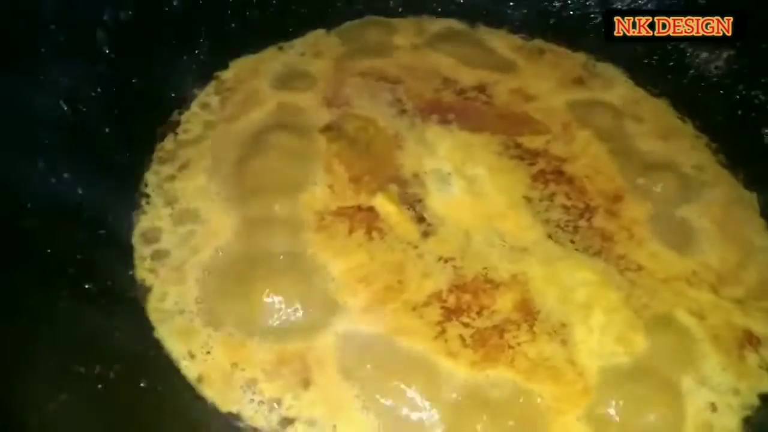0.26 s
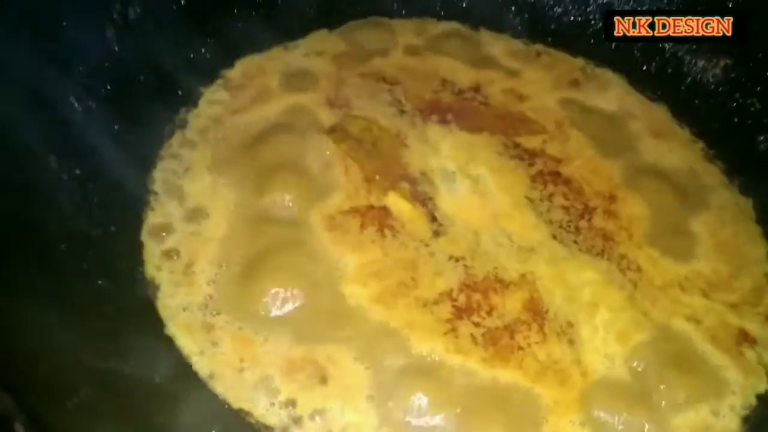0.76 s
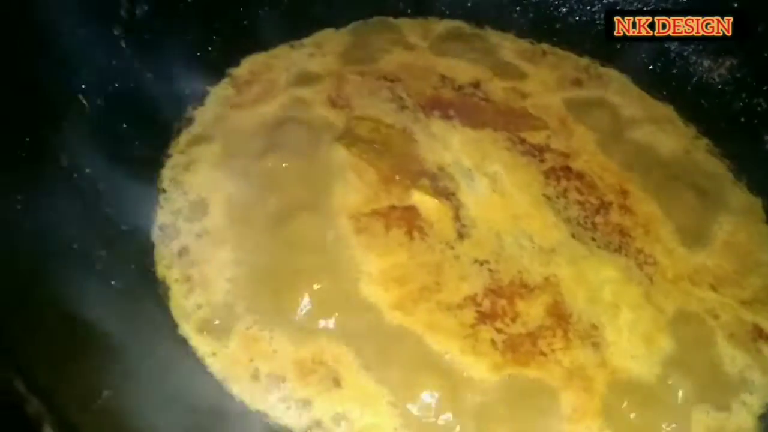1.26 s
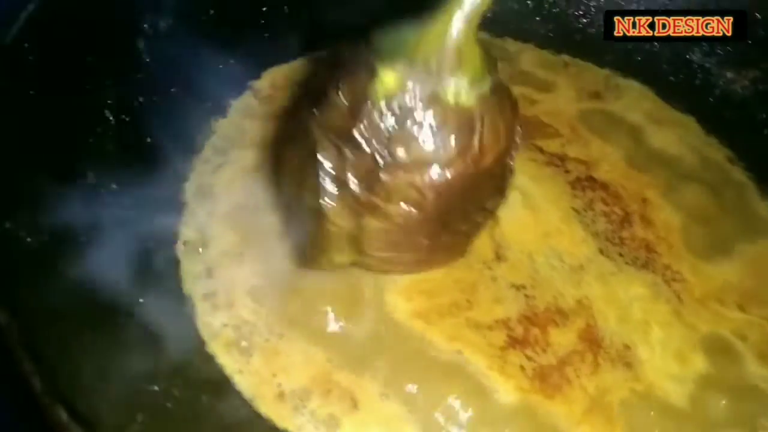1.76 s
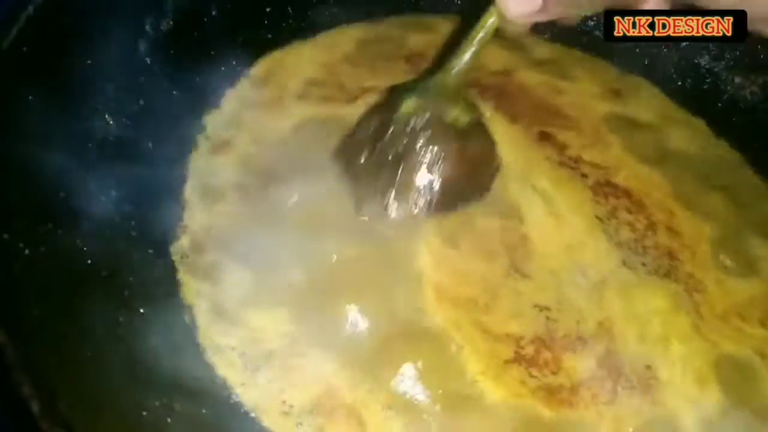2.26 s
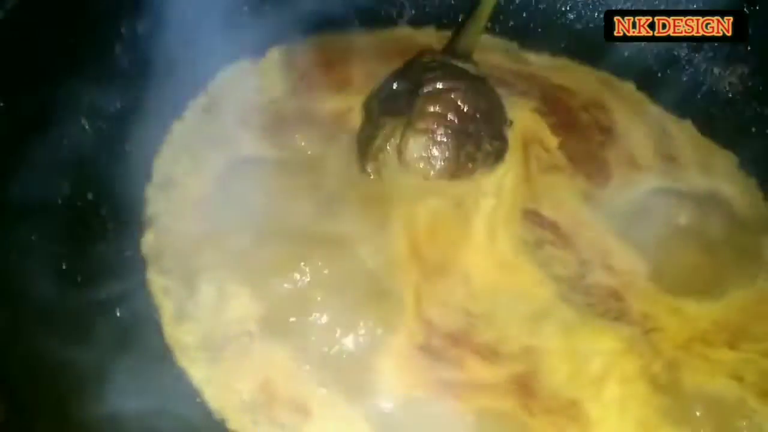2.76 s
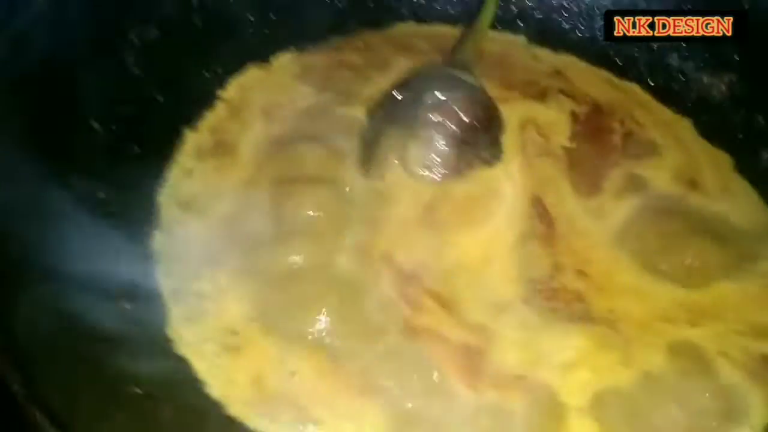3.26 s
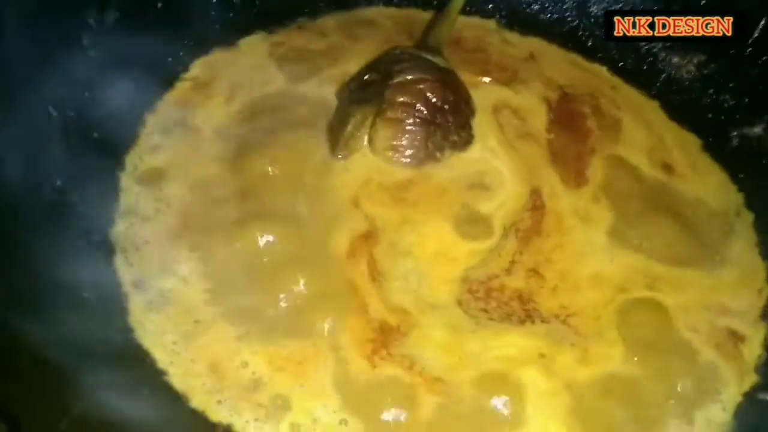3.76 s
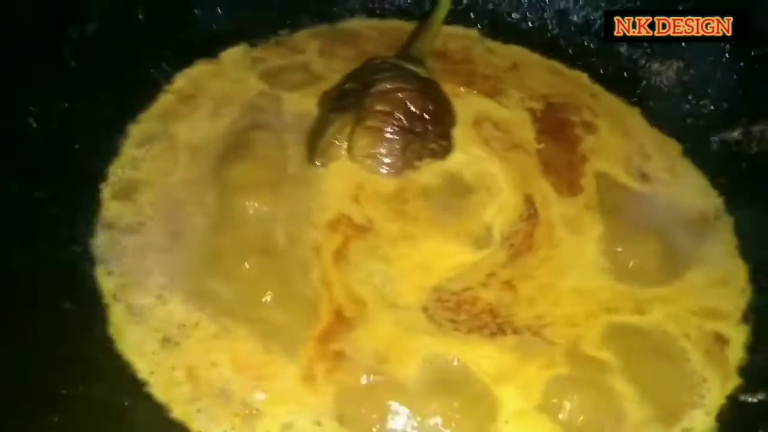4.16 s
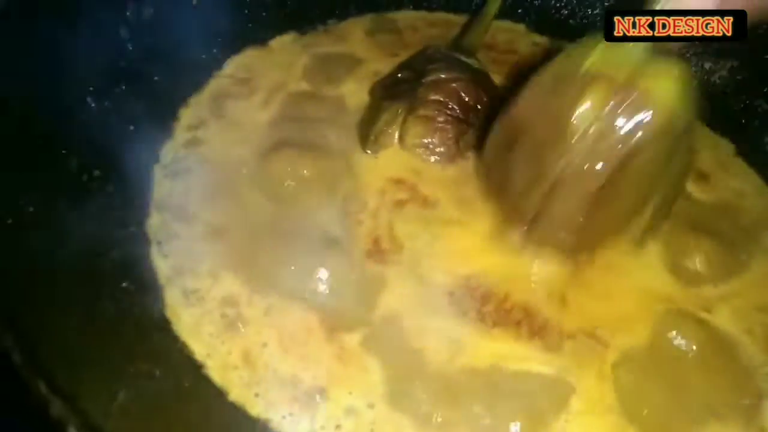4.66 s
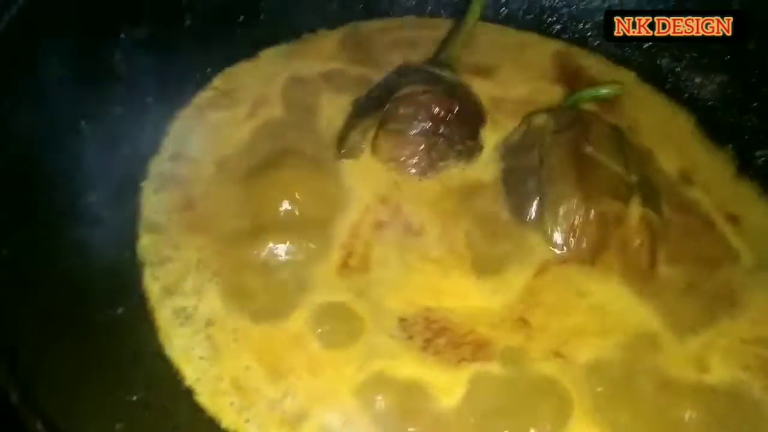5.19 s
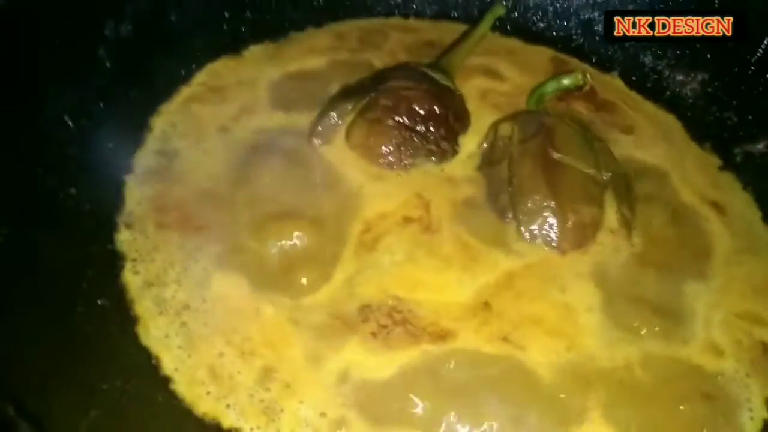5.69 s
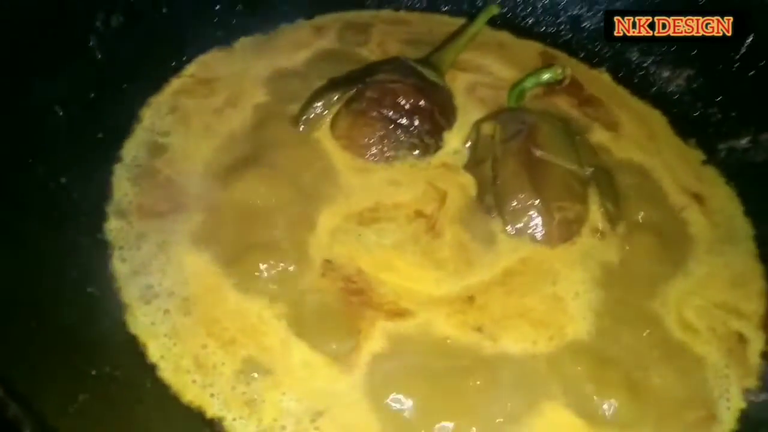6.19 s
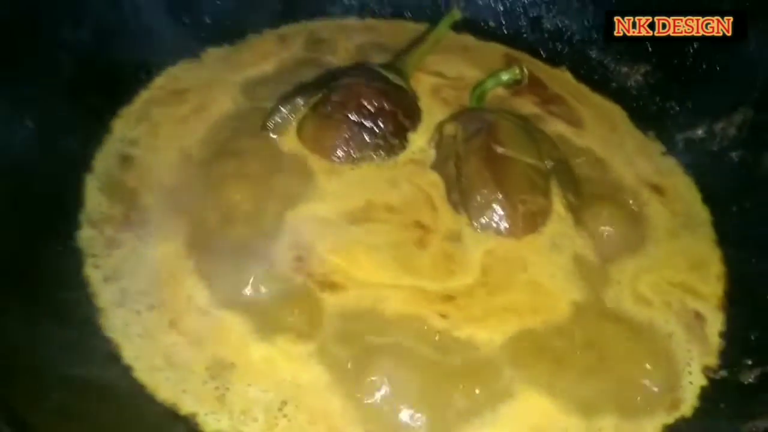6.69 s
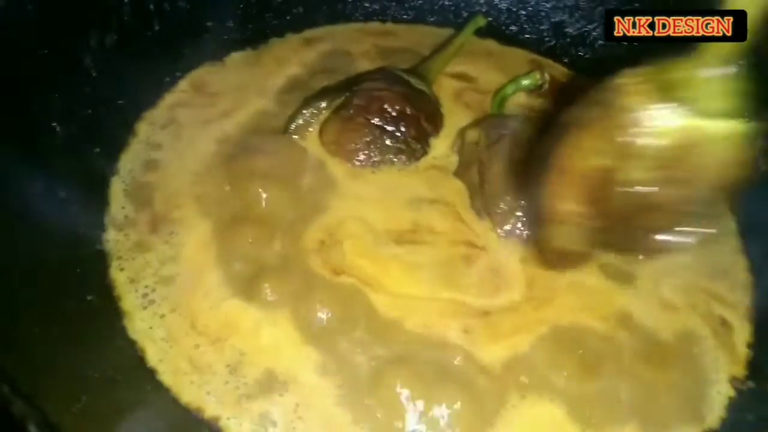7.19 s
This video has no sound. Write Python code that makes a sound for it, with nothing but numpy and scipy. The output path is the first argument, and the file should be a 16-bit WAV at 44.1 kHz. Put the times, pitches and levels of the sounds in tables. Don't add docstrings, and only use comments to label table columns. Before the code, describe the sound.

A close phone pickup of gravy simmering in a wide pan in a kitchen, with faint low hum. Fine fizz, crackle and rim hiss run throughout, dotted with soft, rising deep blips. From the start dull, woody, boomy thumps on the counter repeat every 0.4 seconds. A sharp spit cracks at 0.7. Boiling is lively from 0.5 to 1.6; bright pops and dry fat ticks crowd between 1.4 and 2.1, when the sizzle peaks, with another surge near 2.6. It calms around 3 to 3.9, then strong pops snap at 3.95 to 4.2. From about 4.5 a gas flame flutters as a low, uneven rumble, with short wavering hoots around 100 hertz. Spits crack at 4.9, 5.3 and 5.9. The blows from 5.0 are heavier, especially at 5.0 and 5.8. Pops, flutter and thumps continue until the end near 7.4.

```python
import sys
import numpy as np
from scipy import signal
from scipy.io import wavfile
from scipy.ndimage import uniform_filter1d

SR = 44100
rng = np.random.default_rng(int(sys.argv[2]) if len(sys.argv) > 2 else 0)


def log_audio(samples):
    frames = np.atleast_2d(samples).T
    limited = np.clip(frames, -1, 1)
    pcm = np.round(limited * 32767).astype(np.int16)
    wavfile.write(sys.argv[1], SR, pcm)


def to_linear_factor(level_db):
    exponent = np.asarray(level_db, float) / 20
    return 10 ** exponent


N = 328104

# start_s [s], boil_db [dB], sizzle_db [dB]
SIMMER = [(0, -3, 1.5), (.3, 3.5, -2.5), (.75, 5, 2.5), (1.199, 4.5, 1.5), (1.55, 3.5, 4.5),
          (1.95, -2.5, 7.5), (2.25, 0.5, -0.5), (2.6, 1.5, 6.5), (2.85, -2, -6), (3.6, 0, -7),
          (4.152, -1.5, -1.5), (4.652, -1, -11.5), (5.1, -3, -0.5), (5.5, 1, -3.5), (5.95, -2, -13.5),
          (6.7, -5.5, 3.5), (7.0, 2.5, -9), (7.44, -3, -2)]


def evened(x):
    return x / np.sqrt(np.mean(x ** 2) + 1e-20)


def read(points, hz):
    f, value = np.transpose(points)
    return np.interp(np.log(hz + 1), np.log(f + 1), value)


def add(mix, s, sound):
    part = mix[round(s * SR):][:len(sound)]
    part += sound[:len(part)]


def grid(size):
    return np.fft.rfftfreq(size, 1 / SR)[:, None], np.arange(4 * N // size + 5) * size / 4 / SR


def noise(field_db, size):
    a, b = rng.standard_normal(field_db.T.shape + (2,)).T
    spectrum = (a + 1j * b) * to_linear_factor(field_db)
    x = signal.istft(spectrum, nperseg=size, noverlap=3 * size // 4)[1][:N]
    return x * np.sqrt(4 / 3 / size)


def patches(size, wide_hz, long_s):
    hz, t = grid(size)
    z = rng.standard_normal((len(t), len(hz))).T
    for axis, span in enumerate([wide_hz * size / SR, long_s * 4 * SR / size]):
        for _ in range(2):
            z = uniform_filter1d(z, max(1, round(span)), axis)
    return evened(z)


def kitchen(size=2048):
    # pitch_hz [Hz], level_db [dB per Hz]
    floor = [(25, -18), (100, 11.5), (200, 2), (420, -7), (600, -68)]
    hz, t = grid(size)
    colour_db = read(floor, hz) - 40 * (hz > 900)
    return to_linear_factor(-69.5) * evened(noise(colour_db + 0 * t, size))


def flame(size=2048):
    # start_s [s], level_db [dB], upper_db (share of the upper range) [dB]
    flutter = [(4.4, -71, 2), (4.48, -47, -30), (4.6, -45, 6), (4.77, -47, 5), (4.83, -44.5, -8),
               (5.09, -48, 7), (5.14, -54, 2), (5.201, -41, -4), (5.48, -47.5, 9.5), (5.62, -39.5, 7),
               (5.9, -44.5, -6), (5.998, -47.5, 4.5), (6.29, -46.5, 6), (6.4, -46, -6), (6.55, -51, -17),
               (6.87, -40.5, -2), (7.209, -48, -1.5), (7.39, -46, -2.5)]
    # pitch_hz [Hz], level_db [dB per Hz]
    flame_colour = [(12, -67), (20, -56), (38, -12), (70, -28), (90, -4), (107, -1), (164, -12),
                    (214, -23.5), (276, -27.5), (420, -72), (550, -95), (920, -120)]
    hz, t = grid(size)
    s, level_db, upper_db = np.transpose(flutter)
    lift_db = np.interp(t, s, upper_db) * np.clip((hz - 130) / 80, 0, 1)
    boom_db = 6.6 * np.exp(-((hz - 103) / 9) ** 2)
    lumps_db = 2.0 * patches(size, 50, .08)
    x = evened(noise(read(flame_colour, hz) + lift_db + boom_db + lumps_db, size))
    x = evened(x / (0.16 + uniform_filter1d(x ** 2, size=1200)) ** 0.37)
    drift = uniform_filter1d(rng.standard_normal(N), size=2000)
    gusts_db = 1.4 * evened(uniform_filter1d(drift, size=2000))
    course_db = np.interp(np.arange(N) / SR, [s[0] - .04, *s], [-100, *level_db])
    return x * to_linear_factor(gusts_db + course_db)


def hoots():
    # middle_s [s], length_s [s], peak_db [dB], pitch_hz [Hz]
    catches = [(4.658, 0.084, -34.5, 103.1), (4.748, 0.041, -33.5, 103.7), (4.946, 0.077, -42, 98.2),
               (5.098, 0.065, -38.5, 96.4), (5.205, 0.12, -36.5, 104.5), (5.301, 0.13, -33.5, 103.5),
               (5.609, .1, -37.5, 102.3), (5.77, 0.062, -35, 94.8), (6.025, 0.19, -32.5, 105.6),
               (6.16, 0.081, -43, 104), (6.546, 0.09, -39.5, 99.1), (6.877, 0.072, -39.5, 110),
               (7.001, 0.13, -41, 117), (7.273, 0.066, -41, 110.8), (7.373, 0.0892, -39.5, 113.4),
               (5.362, .06, -54, 262), (5.448, .08, -43.5, 243.6), (5.6, .12, -50, 152.2),
               (5.399, 0.0994, -41, 72), (2.428, 0.0395, -50, 117.5), (6.401, 0.09, -44, 76)]
    out, t = np.zeros(N), np.arange(N) / SR
    swell, pull, waver = np.zeros((3, N)) + [[1e-6], [1e-4], [0]]
    for (s, length, db, hz), turn in zip(catches, rng.random(len(catches))):
        at = np.arange(0, 1.694 * length, 1 / SR)
        start = s - .8 * length
        wobble = 0.82 * np.sin(55 * at + 9 * turn)
        throb_db = 2.5 * np.sin(95 * at + 20 * turn)
        shape = to_linear_factor(db - 2.0) * np.hanning(len(at)) * to_linear_factor(throb_db)
        if 90 < hz < 125:
            add(swell, start, shape)
            add(pull, start, shape * hz)
            add(waver, start, shape * wobble)
        else:
            add(out, start, shape * np.sin(2 * np.pi * (hz * at + turn) + wobble))
    phase = 2 * np.pi * np.cumsum(pull / swell) / SR
    return out + swell * np.sin(phase + waver / swell), swell


def strike_counter(blows, tails_db):
    # pitch_hz [Hz], level_db [dB], t60_s [s]
    counter = [
        [(74.1, -18.5, 0.68), (102.3, -11, 0.61), (113, 4, 0.12), (107.2, 10, 0.069)],
        [(137.76, -2.5, 0.5), (166, -4, 0.215)],
        [(247.2, 12.5, 0.13), (336.7, 15, 0.064), (392, -0.5, 0.13), (474.6, -5, 0.19), (718, -7.5, 0.21)],
        [(1080, 2.5, 0.031), (1280, 6.5, 0.03)],
    ]
    rise_s = [0.0036, 0.0027, 0.0031, 0.0019]
    lag_s = 0.001915
    out, t = np.zeros(N), np.arange(SR // 2)[:, None] / SR
    hz, mode_db, t60 = np.transpose(sum(counter, []))
    group = np.repeat(np.arange(len(counter)), [len(g) for g in counter])
    rise = 1 - np.exp(-t / np.array(rise_s)[group])
    chances = rng.standard_normal((len(blows), 2, len(hz)))
    for (s, db, *groups_db), tail_db, (a, b) in zip(blows, tails_db, chances):
        strike_db = np.array([0, *groups_db])[group] + mode_db + 1.5 * b
        slow_db = tail_db * (t60 > .2)
        decay_db = -60 * t / (t60 * to_linear_factor(0.74 * np.clip(a, -2, 1)))
        mode_hz = hz * (1 + 0.024 * np.clip(a, -1.2, 1.2))
        modes = to_linear_factor(strike_db + slow_db + decay_db) * np.sin(2 * np.pi * mode_hz * t) * rise
        blow = modes.sum(1)
        room = rng.standard_normal(len(t)) * to_linear_factor(-60 * t[:, 0] / 0.31) * (t[:, 0] > .012)
        smear = signal.fftconvolve(blow, room / np.linalg.norm(room))[:len(t)]
        blow = blow + to_linear_factor(tail_db - 7.0) * smear
        add(out, s + lag_s * (s > 0), to_linear_factor(db - 1.35) * blow / abs(blow).max())
    return out


def pounding():
    # start_s [s], peak_db [dB], then upper_boom_db, knock_db, clack_db [dB below the blow]
    blows = [(.2853, -31.5, -6, -28.5, -29), (.6792, -32, -0.5, -4.5, -9), (1.0962, -31, -5, -9.5, -10.5),
             (1.502, -32.5, -3, -7.5, -3.5), (1.8786, -31.5, -3.5, -13, -8), (2.271, -32, 4, -8, -9),
             (2.6351, -36, 1, -17, -17), (3.024, -29.5, -5, -18.5, -11.5), (3.4174, -33, -8.5, -30, -14.5),
             (3.8146, -31, -1, -12, -15), (4.228, -30, -7, -14, -16.5), (4.615, -33, -11, -14, -4.5),
             (5.0036, -23, -11, -21.5, -13), (5.4159, -28.5, 7.5, -12.5, -21),
             (5.83, -23.5, -12, -22.5, -27), (6.2299, -25, -3, -20, -32), (6.6489, -25.5, -13, -19, -9),
             (7.0653, -28, -9, -19.5, -20)]
    faint_blow = (-0.5, -56, 3, -23, -43)
    tails_db = [2.5, -1, -2, -1, 0.5, -3, -4, 0.5, -0.5, 1.5, 3.5, -0.5, 0.5, -1.5, -0.5, 0.5, 1, 2.5, 4]
    grazes = [
        (2.6245, -41.5, 0.0085, -12, 2),
        (3.404, -48, 0, -15, -20),
    ]
    return strike_counter(blows + [faint_blow], tails_db) + strike_counter(grazes, [-6, -6])


def ring(hz, width_hz):
    # delay_s [s], level_db [dB]
    echoes = [(.0011, -17.5), (.0021, -13), (.0033, -19), (.0052, -22)]
    t = np.arange(SR // 50) / SR
    u = 1.6 * np.pi * np.clip(width_hz, 150, 9000) * t
    tick = u ** 2 * np.exp(-u) * np.sin(2 * np.pi * hz * t)
    echo = (u / 2) ** 2 * np.exp(-u / 2) * np.sin(2 * np.pi * 0.837 * hz * t)
    out = tick.copy()
    for (s, db), (a, b) in zip(echoes, rng.random((len(echoes), 2))):
        add(out, s * (0.95 + 0.43 * a), np.sign(b - .5) * to_linear_factor(db) * echo)
    return out / abs(out).max()


def spray(white, low_hz, high_hz, t60):
    band = signal.butter(3, [low_hz, min(high_hz, .45 * SR)], "bandpass", fs=SR, output="sos")
    grain = to_linear_factor(2.4 * evened(uniform_filter1d(white[::-1], size=90)))
    decay = to_linear_factor(-60 * np.arange(len(white)) / SR / t60)
    return evened(signal.sosfilt(band, white * grain)) * decay


def ticks():
    # start_s [s], peak_db [dB], pitch_hz [Hz]
    fat_ticks = [(0.5002, -39, 8760), (1.0607, -37, 9900), (1.6, -38, 9200), (1.722, -37, 9850),
                 (1.743, -41, 10700), (1.751, -37, 5960), (1.762, -42, 10500), (1.861, -35, 6070),
                 (1.953, -36, 5400), (1.978, -38.5, 5540), (2.018, -37, 6450), (2.096, -40, 10600),
                 (3.191, -42.5, 9300), (4.364, -36.5, 11100), (4.4964, -34.5, 10850), (5.004, -35, 10200),
                 (5.0978, -41, 9070), (5.5882, -37, 9080), (5.68, -35.5, 8500), (5.7143, -37.5, 8040),
                 (6.107, -35, 9400), (6.1808, -38, 9260), (6.404, -41, 10500), (6.6253, -38.5, 10500),
                 (7.1322, -29, 9100), (7.394, -40.5, 10100), (.464, -38, 9900), (0.799, -36, 6500),
                 (.862, -45.5, 1500), (0.867, -40, 8800), (1.494, -37, 6900), (1.672, -46, 1490),
                 (2.263, -43.5, 2680), (2.278, -42, 9300), (3.209, -40.5, 4200), (3.8993, -36, 9300),
                 (6.3123, -37, 8950)]
    out = np.zeros(N)
    for s, db, hz in fat_ticks:
        add(out, s, to_linear_factor(db) * ring(hz, 0.15 * hz))
    return out


def spatter(per_s=700, spread_db=3.0, level_db=-53, count=8):
    sizzle_db = np.interp(np.arange(N) / SR, *np.transpose(SIMMER)[[0, 2]])
    burst = to_linear_factor(spread_db * np.minimum(rng.exponential(1, N), 3.5))
    size = burst * (rng.random(N) < per_s * to_linear_factor(.8 * sizzle_db) / SR)
    kind, out = rng.integers(0, count, N), np.zeros(N)
    for k, hz in enumerate(np.geomspace(5600, 8200, count)):
        out += signal.oaconvolve(size * (kind == k), ring(hz, 0.44 * hz))[:N]
    return out * to_linear_factor(level_db + 0.29 * sizzle_db)


def blips():
    # start_s [s], peak_db [dB], pitch_hz [Hz]
    bubbles = [(0.159, -45, 790), (0.313, -51, 830), (0.353, -48, 813), (0.457, -48, 848), (0.53, -58, 810),
               (0.636, -42, 850), (0.681, -45, 787), (0.893, -45.5, 742), (1.096, -48, 859),
               (1.231, -44, 800), (1.379, -63, 650), (1.428, -53, 743), (1.505, -46, 756),
               (1.607, -42.5, 790), (1.691, -47, 742), (1.89, -44, 724), (2.03, -51, 720),
               (2.376, -41.5, 852), (2.534, -54, 846), (2.776, -53, 820), (2.91, -49, 810),
               (3.033, -60, 589), (3.055, -46, 615), (3.724, -49, 597), (3.817, -50, 509),
               (4.399, -56, 830), (4.819, -53, 552), (5.003, -67, 500), (5.332, -47.5, 803),
               (5.83, -51.5, 505), (6.232, -48, 690), (6.355, -49, 824), (6.508, -48, 749),
               (6.755, -50, 775), (6.931, -47, 767), (7.322, -50, 750), (2.79, -54, 810), (6.57, -56, 740),
               (6.96, -50, 780)]
    length_s, climb = 0.03, 0.041
    out, t = np.zeros(N), np.arange(0, length_s, 1 / SR)
    shape = np.sin(np.pi * (t / length_s) ** 0.61) ** 2
    for s, db, hz in bubbles:
        tone = np.sin(2 * np.pi * hz * t * (1 + climb * (t / length_s - 1)))
        add(out, s, to_linear_factor(db - 8.0) * shape * tone)
    return out


def pops():
    # start_s [s], peak_db [dB], pitch_hz [Hz]
    bubble_pops = [(0.5384, -32, 8900), (1.0946, -37, 7280), (1.2262, -32, 8750), (1.4308, -31, 7500),
                   (1.4786, -27.5, 7700), (1.5072, -27, 7070), (1.676, -30.5, 6960), (1.738, -28, 6460),
                   (1.7952, -29, 6900), (1.8243, -29.5, 7000), (1.91, -30, 7200), (1.9365, -29, 5800),
                   (2.047, -29.5, 7100), (2.109, -33.5, 7200), (2.417, -33, 7000), (2.446, -37, 4830),
                   (2.4757, -28, 6260), (2.5305, -27, 6530), (2.72, -34, 5300), (2.896, -35.5, 5530),
                   (3.274, -34, 6000), (3.283, -31.5, 6140), (3.6056, -32, 6860), (3.954, -26, 6700),
                   (4.0064, -24, 6900), (4.0428, -32.5, 5760), (4.124, -27, 5940), (4.1932, -30.5, 6600),
                   (4.152, -36, 5700),
                   (4.477, -32, 6300), (4.4992, -30, 6540), (4.8142, -33, 8650), (5.121, -30.5, 6960),
                  (5.161, -35.5, 7000), (5.3332, -27.5, 5540), (5.456, -33, 7100), (5.5364, -30.5, 6940),
                  (5.5876, -32, 6700), (5.635, -32.5, 6900), (5.75, -35, 5300), (5.914, -30.5, 6100),
                  (6.091, -28.5, 6060), (6.186, -34.5, 5830), (6.2854, -36, 9100), (6.305, -34.5, 8250),
                  (6.4038, -32, 6840), (6.4716, -34, 9000), (6.536, -28, 8960), (6.66, -37, 6100),
                  (6.647, -29, 6650), (6.701, -31.5, 5500), (6.7494, -30.5, 7500), (6.7785, -35, 6300),
                  (6.837, -30, 7150), (6.9521, -35.5, 7270), (7.0738, -34, 8900), (7.1323, -28, 5700),
                  (7.301, -37.5, 8700), (7.425, -37, 9200),
                   (6.7348, -38, 6600), (4.557, -33, 7050), (4.574, -33, 5200), (4.681, -37, 8160),
              (4.7075, -43, 8850), (4.9477, -41, 8200), (5.3614, -30, 6080), (5.5124, -45, 6900),
              (5.552, -33, 7700), (5.5712, -33, 6520), (5.6049, -32.5, 7800), (5.6124, -35, 6900),
              (5.677, -38.5, 5200), (6.726, -35, 4900), (5.79, -46, 5540), (5.8009, -43, 9400),
              (5.9032, -39, 6550), (5.9444, -37, 8540)]
    # start_s [s], peak_db [dB], pitch_hz [Hz], splash_db [dB against the ring]
    plops = [(0.7095, -31, 4330, -14), (0.8918, -46.5, 1530, 1), (1.09, -41, 1390, -16),
             (1.133, -37.5, 2010, -20), (1.232, -37.5, 1460, -8.5), (1.5123, -38, 1560, -8.5),
             (1.6084, -49, 1250, -3), (2.375, -53.5, 1210, 4), (2.447, -37.5, 3350, -14),
             (2.7746, -45, 2600, -25), (2.9126, -48, 1280, -9), (2.625, -42, 1300, -15),
             (4.071, -47.5, 1600, -6), (4.3998, -44, 1600, -41), (4.611, -41, 1250, -16),
             (4.8815, -34, 3740, -16), (5.004, -41, 1160, -28), (5.3332, -28.5, 2020, -11.5),
             (5.589, -35, 2330, -12), (5.612, -45, 2190, -2.5), (5.876, -52, 2734, -12),
             (1.817, -45.5, 1680, -7), (6.7564, -36.5, 1010, -13.5), (6.95, -38.5, 3570, -21)]
    # start_s [s], crack_db [dB], spray_db [dB], lowest_hz [Hz], t60_s [s]
    spits = [(5.334, -60, -49.5, 365, 0.15), (0.7106, -25, -37.5, 2110, 0.036),
             (0.73, -45, -49, 1480, 0.02), (0.757, -50, -50, 1910, 0.16), (1.031, -38, -49, 1710, 0.041),
             (4.861, -45, -50.5, 2640, 0.029), (4.8797, -22.5, -31.5, 2460, 0.019),
             (5.3336, -46, -37, 1450, 0.066), (5.354, -52, -45, 1650, 0.24), (5.42, -55, -51, 1872, 0.66),
             (5.876, -25.5, -42, 2120, 0.046), (6.536, -48, -61, 6140, .03)]
    out, small = np.zeros(N), bubble_pops
    splashes_db = -21 - 2.5 * rng.standard_normal(len(small))
    rows = [(*row, splash_db) for row, splash_db in zip(small, splashes_db)] + plops
    for (s, db, hz, splash_db), white in zip(rows, rng.standard_normal((len(rows), SR // 20))):
        add(out, s, to_linear_factor(db - 3.0) * ring(hz, 450 + 0.07 * hz))
        splash = spray(white, max(0.954 * hz - 250, 700), 1.21 * hz + 500, 0.068)
        add(out, s, to_linear_factor(db + splash_db) * splash)
    for (s, crack_db, db, hz, t60), white in zip(spits, rng.standard_normal((len(spits), SR // 8))):
        add(out, s, to_linear_factor(crack_db) * ring(7950, 3700))
        reach = np.clip(3.0 + .8 * (db + 48), 1.4, 4.7)
        add(out, s, to_linear_factor(db) * spray(white, hz, reach * hz, t60))
    return out


def layer_levels(t):
    # level_db (usual) [dB], boil_share [dB per dB], sizzle_share [dB per dB]
    layers = [
        (-66.5, 1.59, 0.015),
        (-61, 0.45, 0.28),
        (-59.5, 0.043, 0.034),
        (-60, 0.11, 0.76),
        (-58.5, 0.26, 0.16),
    ]
    s, boil_db, sizzle_db = np.transpose(SIMMER)
    boil, sizzle = np.interp(t, s, boil_db), np.interp(t, s, sizzle_db)
    return np.array([db + a * boil + b * sizzle for db, a, b in layers])


def crackle(per_s=220, spread_db=2.0, level_db=-56, count=12):
    burst = to_linear_factor(spread_db * np.minimum(rng.exponential(1, N), 4.0))
    size = burst * (rng.random(N) < per_s / SR)
    kind, out = rng.integers(0, count, N), np.zeros(N)
    for k, hz in enumerate(np.geomspace(1500, 12500, count)):
        tilt_db = read([(1500, -10.0), (3500, -16), (6500, 4.0), (9500, 11.5), (12500, 4)], hz)
        out += signal.oaconvolve(size * (kind == k), to_linear_factor(tilt_db) * ring(hz, 0.21 * hz))[:N]
    fizz_db = layer_levels(np.arange(N) / SR)[3]
    return out * to_linear_factor(level_db + 0.42 * (fizz_db - fizz_db.mean()))


def simmer(size=1024):
    seams_hz = [980, 4750, 5950, 8000]
    # pitch_hz [Hz], level_db [dB per Hz]
    low_colour = [(240, -71), (400, -51), (498, -1.5), (587, -4), (751, -0.5), (854, 2), (1010, -36),
                  (1260, -9), (1460, 1.5), (1570, -4.5), (1770, -6.5), (1960, -11.5), (2270, -3.5),
                  (3100, -3.5), (3550, -6.5), (4620, -48), (7810, -120)]
    high_colour = [(2090, -46), (3550, -48), (3710, -3.5), (4050, -4), (4360, -3.5), (5130, -0.5),
                   (5710, -5.5), (6000, 2), (6390, 7), (7560, 3.5), (8250, -6), (11200, -6), (13200, -13.5),
                   (14900, -17), (15800, -9)]
    # [dB, left aside]
    pan = [(800, 44, 0), (1260, 220, -3), (1740, 97, -4), (2010, 74, -3), (3750, 260, -4), (5170, 28, 0),
           (5540, 300, 0), (7700, 140, -1)]
    # start_s [s], level_db [dB over the boil]
    deep = [(0, 5), (.3, -4), (.6, -2.5), (1.0, -7), (1.3, -0.5), (1.7, 0.5), (2.05, 0), (2.45, 1),
            (2.8, -2.5), (3.1, 7.5), (3.4, 4), (3.62, -5.5), (4.1, 0), (4.8, -1), (5.2, 0), (5.65, 0),
            (6.4, 2.5), (7.2, -5.5)]
    # middle_s [s], length_s [s], change_db [dB], centre_hz [Hz], span [octaves]
    lulls = [(6.7, 0.098, -4, 7000, 0.55), (5.29, 0.087, -13, 7300, 0.18), (4.68, 0.27, -7, 4400, 0.22),
             (5.29, 0.18, -6, 3900, 0.42), (5.6, .3, 7, 6200, 0.17), (7.15, 0.38, -4, 3440, 0.37),
             (6.3, 0.21, -9, 1460, 0.23), (2.9, 0.31, -4.5, 8700, 0.51), (2.9, 0.29, 2.5, 5300, 0.64),
             (7.35, .12, -6, 6900, 0.35), (0.23, 0.38, -7, 520, 0.27), (2.043, 0.39, 13, 565, 0.41),
             (2.555, 0.25, 10, 460, .4), (2.7, 0.24, -8, 280, .3), (3.22, 0.17, -7, 1210, 0.72),
             (5.6, 1, -6.5, 865, 0.19), (5.4, 0.19, 0, 1250, 0.27), (0.2, 0.54, 1, 1090, 0.6),
             (7.3, 0.26, -8, 1950, 0.11), (6.3, 0.12, 8, 880, 0.21), (4.15, 0.32, -14, 580, 0.18),
             (6.03, 0.6, 2, 2840, 0.35), (5.68, 0.12, 5.5, 2770, 0.63), (5.96, 0.14, 9.5, 6500, 0.16),
             (1.14, 0.68, -5, 3830, 0.45), (4.1, 0.12, -2, 10000, .15)]
    hz, t = grid(size)
    layer = np.searchsorted(seams_hz, hz[:, 0])
    colour_db = np.where(hz < 3500, read(low_colour, hz), read(high_colour, hz))
    colour_db = colour_db + sum(3.5 * np.exp(-((hz - f) / min(w, 120)) ** 2) for f, w, _ in pan)
    power = np.bincount(layer, to_linear_factor(2 * colour_db[:, 0])) / len(hz)
    colour_db = colour_db - 10 * np.log10(power[layer, None])

    level_db = layer_levels(t)[layer]
    blended = uniform_filter1d(colour_db + level_db, size=21, axis=0)
    blended = blended - uniform_filter1d(colour_db, size=21, axis=0)
    level_db = np.where((hz > 3000) & (hz < 7400), blended, level_db)
    level_db = level_db + (layer[:, None] == 0) * np.interp(t, *np.transpose(deep))
    for s, length, db, centre_hz, octaves in lulls:
        away = (2 * (t - s) / length) ** 4 + (np.log2((hz + 1) / centre_hz) / octaves) ** 4
        level_db = level_db + db * np.exp(-away)

    depth_db = read([(600, 3.0), (2500, 3.55), (4300, 3.7), (5300, 2.3), (7900, 4.3), (8600, 2.6),
                     (12000, 0.7)], hz)
    streaks = patches(size, 90, 0.16)
    clouds = read([(700, 0.9), (2000, 0.65), (6000, 0.14)], hz) * patches(size, 600, 0.079)
    mottle_db = np.minimum(depth_db * (streaks + clouds), 4.5 * depth_db)
    flicker_db = 1.19 * evened(uniform_filter1d(rng.standard_normal(N), size=150))
    surge_db = read([(5000, 0.17), (9000, 1.2), (13000, 1.65)], hz) * patches(size, 5500, .015)
    return noise(4.0 + colour_db + level_db + mottle_db + surge_db, size) * to_linear_factor(flicker_db)


def scene():
    boom, swell = hoots()
    flutter = flame() / np.sqrt(1 + (swell / to_linear_factor(-31.5)) ** 2)
    gravy = simmer() + crackle() + pops() + blips()
    fat = spatter() + ticks()
    return (kitchen() + flutter + boom + pounding() + fat + gravy)[None]


def top_cut(x):
    return signal.sosfilt(signal.butter(12, 16460, fs=SR, output="sos"), x)


def record(dry, size=512):
    hz, t, z = signal.stft(dry, SR, nperseg=size, noverlap=3 * size // 4)
    hz = hz[:, None]
    power = uniform_filter1d(abs(z) ** 2, size=9, axis=2)
    usual = np.quantile(power[..., ::8], .3, axis=2, keepdims=True)
    keep = np.clip(1 - .5 * usual / (power + 1e-20), to_linear_factor(-11.5), 1)
    shut_s, shut_length_s, shut_db = 5.838, 0.012, -14
    keep = keep * to_linear_factor(shut_db * np.exp(-((t - shut_s) / shut_length_s) ** 2) * (hz > 3400))
    z = z * np.where(hz < 8000, keep, 1)
    z = z * np.clip((15900 - hz) / 900, 0, 1) * (hz < 15750)
    z = z * (1 - 0.67 * np.exp(-((hz - 3550) / 90) ** 2))
    clean = signal.istft(z, SR, nperseg=size, noverlap=3 * size // 4)[1][:, :N]
    rumble_cut = signal.butter(2, 34, "highpass", fs=SR, output="sos")
    return top_cut(signal.sosfiltfilt(rumble_cut, clean))


dry = scene()
out = record(dry)
log_audio(out)
```